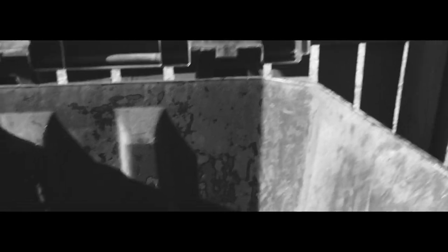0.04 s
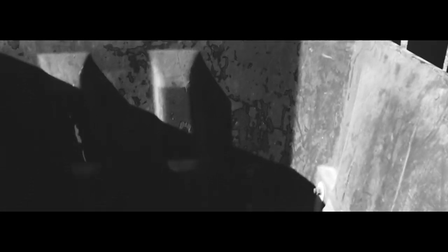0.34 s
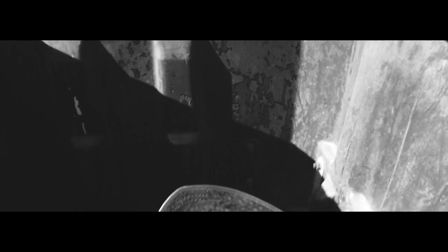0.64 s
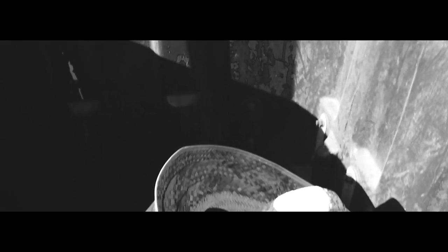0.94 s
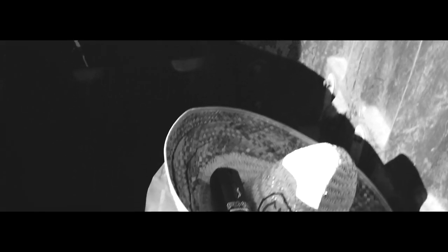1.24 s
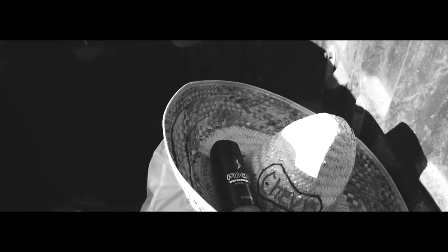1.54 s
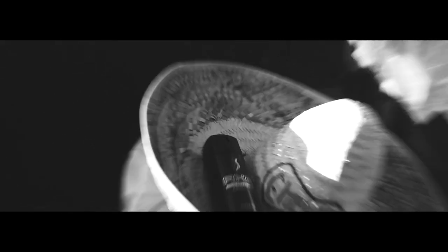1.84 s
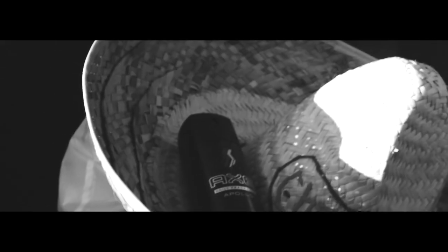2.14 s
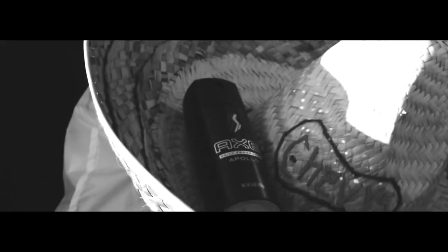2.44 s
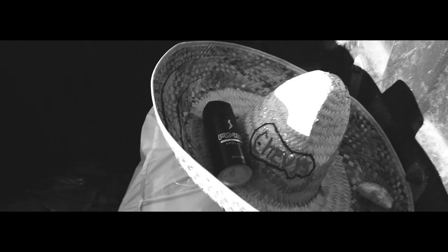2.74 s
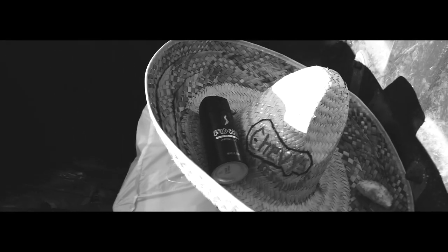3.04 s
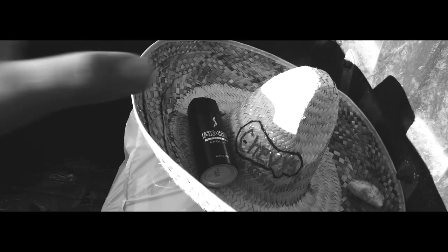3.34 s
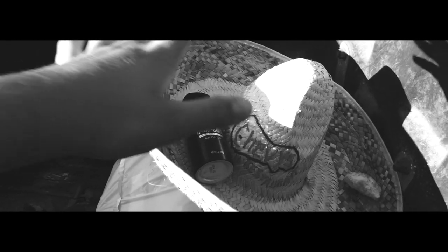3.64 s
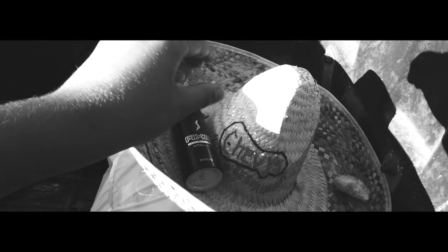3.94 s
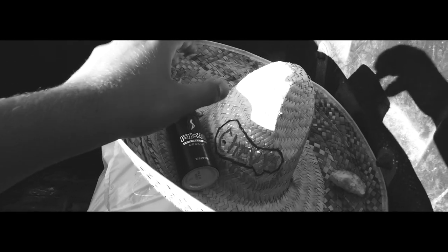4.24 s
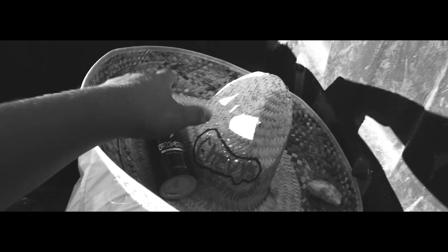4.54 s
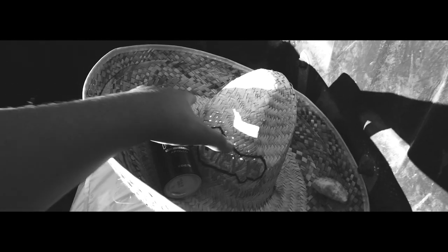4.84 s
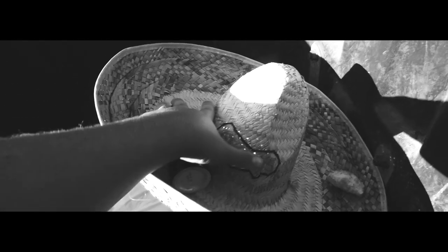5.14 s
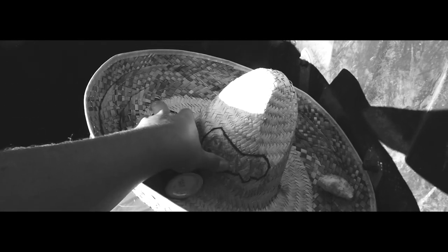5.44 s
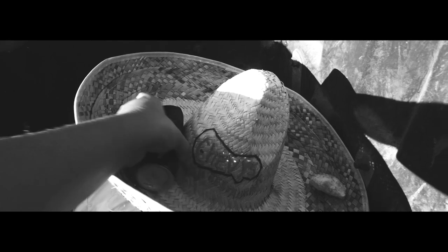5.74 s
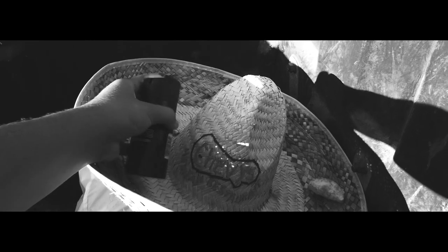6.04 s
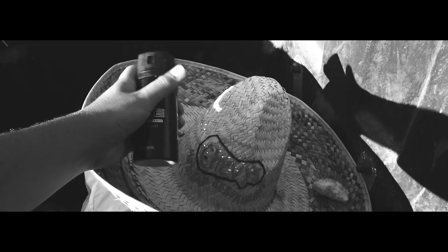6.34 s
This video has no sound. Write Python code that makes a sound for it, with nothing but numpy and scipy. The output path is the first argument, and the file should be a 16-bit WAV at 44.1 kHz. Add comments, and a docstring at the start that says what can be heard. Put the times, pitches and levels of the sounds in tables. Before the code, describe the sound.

In a quiet yard, a plastic wheelie-bin lid is thrown open, bangs against the hollow bin and clatters to rest on its loose hinge. Soft thumps, sleeve swishes and one sharp knock follow, right at the hand-held camera's microphone. After a pause, a straw hat rustles and crackles faintly as a hand lifts a spray can out of it, with a few tiny metallic ticks.

```python
"""A yard, heard through the one microphone of a hand-held camera: a quiet hush and low grip rumble.
The lid of a plastic wheelie bin is thrown open, bangs against the bin and bounces to rest on its
loose hinge; the hollow bin booms and the yard throws the clacks back. From about 2 s the camera is
shifted: soft thumps, sleeve swishes and one sharp knock on its case, right at the microphone.
From 5 s a hand takes a spray can out of a rustling straw hat in the bin."""
import sys
import numpy as np
from scipy import signal
from scipy.fft import rfft, irfft, next_fast_len
from scipy.io import wavfile

SR = 44100
rng = np.random.default_rng(int(sys.argv[2]) if len(sys.argv) > 2 else 0)


def to_wav(s):
    """Save 16-bit WAV."""
    ch = np.atleast_2d(s).T  # columns
    pcm = np.round(np.clip(ch, -1, 1) * 32767)  # PCM
    wavfile.write(sys.argv[1], SR, pcm.astype(np.int16))


N = 286650
TIME = np.arange(N) / SR

# outdoor air and microphone hiss: (frequency [Hz], level [dB])
HUSH_SPECTRUM = [(35, -39), (60, -1.5), (91, -14), (124, -12.5), (268, -23.5), (448, -25.5), (566, -23.5),
                 (862, -21), (1310, -23), (2710, -37), (4750, -33), (6430, -37), (9350, -39),
                 (10500, -47.5), (16000, -51.5)]
# narrow bands that stand out of the hush: (frequency [Hz], width [Hz], gain [dB])
HUSH_PEAKS = [(1170, 260, 0.5), (5060, 310, 3.5), (7340, 280, 4), (9300, 330, 5.5)]
# course of the hush: (time [s], level [dB])
HUSH_LEVELS = [(0, -49.5), (.5, -49.5), (1.5, -52.5), (2.3, -53), (3.5, -54), (5, -53), (6.5, -53)]
# rumble of the grip and of air on the microphone: (frequency [Hz], level [dB])
RUMBLE_SPECTRUM = [(0, -29), (15, 1), (35, -1.5), (62, -3.5), (90, -13.5), (125, -8.5), (170, -18),
                   (250, -25), (600, -37), (1500, -46), (4000, -66)]
# course of that rumble: (time [s], relative level [dB])
RUMBLE_LEVELS = [(0.0, -28), (0.16, -50), (0.38, -34), (0.58, -34.5), (0.9, -34.5), (1.14, -34),
                 (1.55, -42.5), (1.81, -37.5), (2.24, -45.5), (2.97, -35), (3.17, -49.5), (5.16, -50),
                 (5.32, -54.5), (6.5, -53)]

# blows of the lid on the bin; a hard edge (high corner) lands first, then the soft face slaps down:
# (time [s], clack level [dB], contact corner [Hz], boom level [dB])
LID_BLOWS = [(.105, -28, 750, -57), (.117, -28, 440, -31.5), (.4496, -10.5, 3220, -28),
             (0.4622, -18, 5500, -40), (0.4641, -21.5, 5500, -38), (.467, -15.5, 265, -23),
             (.471, -15.5, 3570, -42), (.472, -8.5, 1660, -28), (0.488, -22.5, 300, -26),
             (.566, -20, 870, -32), (.592, -18.5, 920, -36), (.633, -17.5, 450, -29.5),
             (0.653, -25.5, 880, -26), (.779, -31, 790, -32), (.797, -28, 776, -39),
             (.879, -18.5, 2690, -44), (0.898, -13.5, 710, -16.5), (0.904, -12.5, 930, -33),
             (.914, -17, 630, -26.5), (.928, -15, 930, -25.5), (0.979, -24, 220, -24),
             (1.006, -18, 850, -39), (1.038, -27, 1740, -24), (1.041, -13.5, 674, -36),
             (1.099, -30, 433, -22.5), (1.177, -23, 1190, -44), (1.182, -20, 2420, -46),
             (1.204, -15.5, 900, -24), (1.214, -14.5, 560, -37), (1.226, -29.5, 255, -23.5),
             (1.309, -24, 1080, -42), (1.316, -18, 642, -28), (1.328, -29.5, 350, -22),
             (1.378, -30, 600, -42), (1.563, -43.5, 2820, -46), (1.604, -34, 580, -34),
             (1.739, -36, 636, -32)]
# modes of the hollow bin and its walls: (frequency [Hz], level [dB], t60 [s])
BIN_MODES = [(61.2, -7, 0.61), (80, -3, 0.36), (112.3, 3, 0.55), (137, -11, 0.19), (211.4, -2, 0.3),
             (252.5, -15.5, 0.21), (294.4, -15, 0.31), (333.2, -8, 0.24), (396, -15, 0.33),
             (453, -17, 0.34), (493, -13, 0.3), (720, -7, 0.16)]
# colour of the plastic under a hard blow: (frequency [Hz], level [dB])
PLASTIC_SPECTRUM = [(40, -16.5), (120, -2.5), (210, 1.5), (400, -1), (650, -5.5), (1000, -5), (1700, -10),
                    (3000, -11.5), (3700, -15.5), (6000, -15), (9000, -8.5), (11000, -12.5), (16000, -20)]
# resonances of the lid: (frequency [Hz], width [Hz], gain [dB])
LID_PEAKS = [(560, 21, -2.5), (780, 97, 0.5), (1230, 39, 6.5), (1280, 53, 0.5), (1393, 79, 5.5),
             (1900, 19, -1), (2270, 190, 4.5), (2500, 48, -6.5), (2610, 83, 4), (3220, 67, 1)]
# ringing of the plastic after a light blow with a 1 kHz contact corner: (frequency [Hz], t60 [s])
PLASTIC_DECAY = [(100, 0.42), (300, 0.14), (800, 0.13), (2000, 0.064), (5000, 0.07), (14000, 0.073)]
# reverberation of the yard: (frequency [Hz], t60 [s])
YARD_DECAY = [(100, 1), (400, 1), (1000, 0.26), (3000, 0.18), (10000, 0.31)]
# colour of the rubbing hinge: (frequency [Hz], level [dB])
HINGE_SPECTRUM = [(300, -15), (1500, 9.5), (3500, -3), (6500, -8.5), (9500, -13.5), (11000, -21),
                  (16000, -31)]
# the swinging lid scrapes on its hinge: (peak time [s], level [dB], rise [s], fall [s])
HINGE_SCRAPES = [(.485, -34, .01, 0.038), (.564, -36, 0.005, 0.011), (.593, -38, 0.029, 0.021),
                 (.655, -42.5, 0.08, 0.066), (.8, -54.5, 0.027, 0.048), (.93, -44, 0.018, 0.057),
                 (1.04, -44, 0.016, 0.018), (1.315, -46, .03, 0.03)]
# faint high whistles in the hush: (start [s], end [s], frequency [Hz])
WHISTLES = [(.21, 0.297, 9550), (1.6, 1.743, 4230), (2.268, 2.42, 4300), (2.377, 2.67, 9340),
            (2.952, 3.116, 4250), (3.469, 3.815, 9440), (3.997, 4.277, 9400), (4.206, 4.33, 4270),
            (4.616, 4.85, 9460)]

# soft bumps of the hand on the camera: (peak time [s], level [dB], frequency [Hz])
HAND_BUMPS = [(1.847, -16, 57), (1.955, -18, 134), (1.963, -23, 41.7), (2.418, -30.5, 43.6),
              (2.643, -24, 117), (2.794, -20, 130), (2.848, -21, 26.2), (3.051, -15, 41.6),
              (3.135, -28.5, 24.6)]
# fingers rub on the camera, later on the hat: (peak time [s], level [dB], rise [s], fall [s])
FINGER_RUBS = [(1.96, -41.5, 0.06, 0.14), (2.54, -47, 0.21, 0.13), (2.64, -43.5, .03, 0.12),
               (2.705, -38, 0.094, 0.041), (3.015, -41, 0.046, 0.089), (3.13, -49.5, 0.07, .08),
               (5.53, -47, 0.065, 0.38), (5.785, -50, 0.088, 0.1)]
# colour of rubbing skin: (frequency [Hz], level [dB])
SKIN_SPECTRUM = [(40, -23), (150, -1), (300, -4), (520, -10), (750, -15.5), (1500, -21.5), (4000, -31),
                 (16000, -41)]
# sleeve sliding by the microphone:
# (peak time [s], relative level [dB], rise [s], fall [s], treble tilt [dB])
SLEEVE_SWISHES = [(1.85, -52.5, .03, 0.13, 1), (1.922, -45.5, 0.086, 0.087, -1.5),
                  (2.779, -42, 0.11, 0.018, 2.5), (3.067, -50.5, 0.017, 0.045, 8)]
# colour of sliding cloth: (frequency [Hz], level [dB])
CLOTH_SPECTRUM = [(300, -3), (1000, 2), (2400, -5.5), (4600, -12.5), (7000, -7), (9200, -4.5),
                  (11000, -10.5), (16000, -18)]
# knocks on the camera case: (time [s], level [dB], contact corner [Hz], t60 [s])
CASE_KNOCKS = [(2.698, -44, 2360, 0.015), (2.786, -22.5, 12000, 0.035), (2.788, -24.5, 1490, 0.038),
               (2.794, -27, 704, 0.088), (2.7941, -37.5, 7100, 0.076)]
# colour of the knocked case: (frequency [Hz], level [dB])
CASE_SPECTRUM = [(40, -18.5), (160, 15.5), (400, -8), (1100, 3), (1600, -3), (2400, -8.5), (3500, 1),
                 (4400, -10), (7000, -8), (9300, -4.5), (11000, -10), (16000, -9)]

# hand and can sliding on the straw: (peak time [s], relative level [dB], rise [s], fall [s])
STRAW_SLIDES = [(5.045, -57, 0.02, 0.19), (5.235, -57, .02, .06), (5.37, -58, .06, 0.088),
                (5.44, -47, 0.022, 0.11), (5.545, -54.5, 0.082, 0.14), (5.715, -47.5, 0.064, 0.12),
                (5.786, -50, 0.036, .09), (5.89, -55, 0.056, 0.1), (6.035, -52, 0.28, .25),
                (6.245, -45.5, 0.045, 0.057), (6.325, -54.5, 0.078, 0.04), (6.468, -46, 0.097, .06)]
# colour of rustling straw: (frequency [Hz], level [dB])
RUSTLE_SPECTRUM = [(700, -11), (1600, -7.5), (2600, -7), (3800, -7), (5200, -11), (7300, -6.5),
                   (9200, -6.5), (11000, -14), (14000, -12), (16000, -20)]
# snaps of the straw weave: (time [s], level [dB])
STRAW_SNAPS = [(5.0383, -50), (5.229, -42.5), (5.403, -45.5), (5.437, -38.5), (5.442, -44.5), (5.456, -43),
               (5.47, -53), (5.701, -50), (5.785, -45), (6.032, -43.5), (6.324, -53)]
# colour of a snap: (frequency [Hz], level [dB])
SNAP_SPECTRUM = [(240, -7), (400, -5), (1060, -7.5), (1560, 0), (1960, -9.5), (2590, -10), (2880, -13),
                 (5430, -16.5), (8630, -13), (14100, -23), (16000, -17)]
# the can rings when touched: (time [s], level [dB], frequency [Hz], t60 [s])
CAN_RINGS = [(5.47, -43, 2920, .04), (5.471, -42, 3530, .03), (5.701, -44, 2590, 0.034),
             (5.72, -42, 2850, .05), (5.875, -60, 3380, .15), (6.256, -36, 2440, 0.055)]
# the can bumps on the crown of the hat: (time [s], level [dB])
CAN_BUMPS = [(5.594, -35), (5.784, -50), (5.873, -48)]
# modes of the crown: (frequency [Hz], level [dB], t60 [s])
CROWN_MODES = [(350, -4, 0.067), (450, 6, 0.025), (560, 2, 0.066)]


def amp(db):
    """Decibels to gain."""
    return 10 ** (np.asarray(db) / 20)


def unit(x):
    """Scales to rms 1."""
    return x / np.sqrt(np.mean(x ** 2) + 1e-20)


def read(points, hz):
    """Reads a table on a log-frequency axis."""
    frequencies, values = np.transpose(points)
    return np.interp(np.log(hz + 1), np.log(frequencies + 1), values)


def level(rows):
    """Gain over time from rows (time [s], level [dB])."""
    times, db = np.transpose(rows)
    return amp(np.interp(TIME, times, db))


def add(mix, at, sound):
    """Mixes a sound in at a time in seconds."""
    part = mix[max(round(at * SR), 0):][:len(sound)]
    part += sound[:len(part)]


def colour(x, spectrum, peaks=(), corner_hz=None, corner_db=0):
    """Causal filter: a spectrum, resonances, and a springy contact that cuts treble above its corner."""
    size = next_fast_len(len(x) + SR // 10)
    hz = abs(np.fft.fftfreq(size, 1 / SR))
    db = read(spectrum, hz)
    db += sum(gain / (1 + (2 * (hz - centre) / width) ** 2) for centre, width, gain in peaks)
    if corner_hz:
        db += corner_db / (1 + (3 * (hz / corner_hz - 1)) ** 2)  # the contact rings at its corner
        db -= 10 * np.log10(1 + (hz / corner_hz) ** 5)
    log_gain = np.log(amp(np.maximum(db, -100)))
    minimum_phase = np.exp(np.conj(signal.hilbert(log_gain)))
    return np.fft.ifft(np.fft.fft(x, size) * minimum_phase).real[:len(x)]


def soften(x, corner_hz):
    """Low-pass: a slow push leaves out the treble."""
    return signal.sosfilt(signal.butter(2, corner_hz, fs=SR, output="sos"), x)


def ringing(modes):
    """Dying sines from rows (frequency [Hz], level [dB], t60 [s])."""
    t = np.arange(SR // 2) / SR
    return sum(amp(db - 60 * t / t60) * np.sin(2 * np.pi * hz * t) for hz, db, t60 in modes)


def dense_ringing(decay, size):
    """Countless close modes: noise whose bands each die at their own speed."""
    t, hz = np.arange(size) / SR, np.fft.rfftfreq(size, 1 / SR)
    noise = np.exp(2j * np.pi * rng.random(len(hz)))
    out = np.zeros(size)
    for centre, t60 in decay:
        band = read([(f, f == centre) for f, _ in decay], hz)
        out += irfft(noise * band, size) * amp(-60 * t / t60)
    return np.sqrt(size) * out


def strike(decay, crack, spectrum, peaks=(), corner_hz=None, corner_db=4):
    """A contact pulse (the crack) and its dense ringing, with the energy of 10 ms at rms 1."""
    ring = dense_ringing(decay, size=6144)
    ring[0] += crack * np.linalg.norm(ring)
    sound = colour(ring, spectrum, peaks, corner_hz, corner_db)
    return -sound / np.linalg.norm(sound) * np.sqrt(SR / 100)


def strokes(rows):
    """Gain of strokes that swell and die away, 20 dB per rise or fall time; their powers add."""
    power = np.zeros(N)
    for peak, db, rise, fall in rows:
        away = np.maximum((peak - TIME) / rise, (TIME - peak) / fall)
        near = away < 3
        power[near] += amp(db - 20 * away[near]) ** 2
    return np.sqrt(power)


def friction(spectrum, grains_per_s, spread_db, hiss):
    """Surfaces catch and slip: tiny clicks of uneven size over a smooth hiss."""
    sizes = amp(spread_db * np.minimum(rng.exponential(1, N), 4)) * rng.choice([-1, 1], N)
    grains = sizes * (rng.random(N) < grains_per_s / SR)
    return unit(colour(unit(grains) + hiss * rng.standard_normal(N), spectrum))


def outdoor_hush():
    """The air of the yard and the hiss of the microphone, nearly steady."""
    return level(HUSH_LEVELS) * unit(colour(rng.standard_normal(N), HUSH_SPECTRUM, HUSH_PEAKS))


def grip_rumble(gain_db=3):
    """The grip and air on the microphone rumble as the camera moves."""
    return amp(gain_db) * level(RUMBLE_LEVELS) * unit(colour(rng.standard_normal(N), RUMBLE_SPECTRUM))


def bin_lid(firm_db=-19, yard_db=-14, yard_delay_s=0.007):
    """Every blow clacks in the plastic and sets the bin booming; the yard throws the clacks back."""
    clacks, booms, echo = np.zeros((3, N))
    boom = soften(ringing(BIN_MODES), corner_hz=420)
    for at, clack_db, corner_hz, boom_db in LID_BLOWS:
        # harder contacts and firmer blows crack more and ring shorter
        hardness = corner_hz / 1000
        firmness_db = max(clack_db - firm_db, 0)
        crack = 0.21 * hardness ** 0.4 * amp(firmness_db)
        ring_scale = hardness ** -0.24 * amp(-0.52 * firmness_db)
        decay = [(hz, t60 * ring_scale) for hz, t60 in PLASTIC_DECAY]
        add(clacks, at, amp(clack_db) * strike(decay, crack, PLASTIC_SPECTRUM, LID_PEAKS, corner_hz))
        add(booms, at, amp(boom_db) * boom)
    yard = dense_ringing(YARD_DECAY, size=32768)
    add(echo, yard_delay_s, signal.fftconvolve(clacks, yard / np.linalg.norm(yard)))
    return clacks + booms + amp(yard_db) * echo


def hinge(chatter_db=-30, rise_s=0.004, fall_s=0.06):
    """The loose hinge chatters after every blow and scrapes as the lid swings."""
    chatter = [(at, clack_db + chatter_db, rise_s, fall_s) for at, clack_db, _, _ in LID_BLOWS]
    scraping = friction(HINGE_SPECTRUM, grains_per_s=670, spread_db=2, hiss=1.0)
    return strokes(HINGE_SCRAPES + chatter) * scraping


def whistles(waver_rate_hz=140, waver_depth_hz=115, level_db=-66):
    """Thin tones swell and fade, wavering so quickly that they blur into the hush."""
    out = np.zeros(N)
    for start, end, hz in WHISTLES:
        size = round((end - start) * SR)
        waver = unit(soften(rng.standard_normal(SR), waver_rate_hz))[:size]
        phase = 2 * np.pi * np.cumsum(hz + waver_depth_hz * waver) / SR
        add(out, start, signal.windows.tukey(size, 0.7) * np.sin(phase))
    return amp(level_db) * out


def handling(half_length_cycles=0.84):
    """Fingers rub on camera and hat; soft bumps rock the microphone for a cycle or two."""
    out = strokes(FINGER_RUBS) * friction(SKIN_SPECTRUM, grains_per_s=700, spread_db=4, hiss=0.72)
    for peak, db, hz in HAND_BUMPS:
        cycles = hz * (TIME - peak)
        out += amp(db) * np.exp(-(cycles / half_length_cycles) ** 2) * np.cos(2 * np.pi * cycles)
    return out


def sleeve(gain_db=1.5, tilt_from_hz=4000, tilt_to_hz=8000):
    """Cloth slides close by the microphone, each swish with its own brightness."""
    cloth = rfft(friction(CLOTH_SPECTRUM, grains_per_s=2800, spread_db=1, hiss=4.0))
    hz = np.fft.rfftfreq(N, 1 / SR)
    out = np.zeros(N)
    for *stroke, tilt_db in SLEEVE_SWISHES:
        tilt = amp(read([(tilt_from_hz, 0), (tilt_to_hz, tilt_db)], hz))
        out += strokes([stroke]) * unit(irfft(cloth * tilt, N))
    return amp(gain_db) * out


def case_knocks(crack=0.56):
    """Hard touches knock on the well-damped camera case, right at the microphone."""
    out = np.zeros(N)
    for at, db, corner_hz, t60 in CASE_KNOCKS:
        knock = strike([(1000, t60)], crack, CASE_SPECTRUM, corner_hz=corner_hz, corner_db=-5.5)
        add(out, at, amp(db) * knock)
    return out


def straw_hat(rustle_db=1, crack=0.09, snap_t60_s=0.033):
    """Down in the bin, the straw weave rustles and snaps under hand and can."""
    rustle = friction(RUSTLE_SPECTRUM, grains_per_s=600, spread_db=1, hiss=1.0)
    out = amp(rustle_db) * strokes(STRAW_SLIDES) * rustle
    for at, db in STRAW_SNAPS:
        add(out, at, amp(db) * strike([(1000, snap_t60_s)], crack, SNAP_SPECTRUM))
    return out


def spray_can():
    """The can rings briefly when touched and bumps dully on the crown of the hat."""
    out = np.zeros(N)
    for at, db, hz, t60 in CAN_RINGS:
        add(out, at, ringing([(hz, db, t60)]))
    bump = soften(ringing(CROWN_MODES), corner_hz=650)
    for at, db in CAN_BUMPS:
        add(out, at, amp(db) * bump)
    return out


def scene():
    """All sources at one hand-held microphone in the yard."""
    mix = outdoor_hush() + grip_rumble() + bin_lid() + hinge() + whistles()
    mix += handling() + sleeve() + case_knocks()
    mix += straw_hat() + spray_can()
    return mix[None]


def record(dry, low_cut_hz=10, band_limit_hz=15900):
    """The microphone drops the deepest rumble, clips at full scale and loses the highest treble."""
    low_cut = signal.butter(1, low_cut_hz, "high", fs=SR, output="sos")
    clipped = np.clip(signal.sosfilt(low_cut, dry), -1, 1)
    band_limit = signal.firwin(511, band_limit_hz, window=("kaiser", 9), fs=SR)
    return signal.oaconvolve(clipped, band_limit[None], "same")


dry = scene()
out = record(dry)
to_wav(out)
```